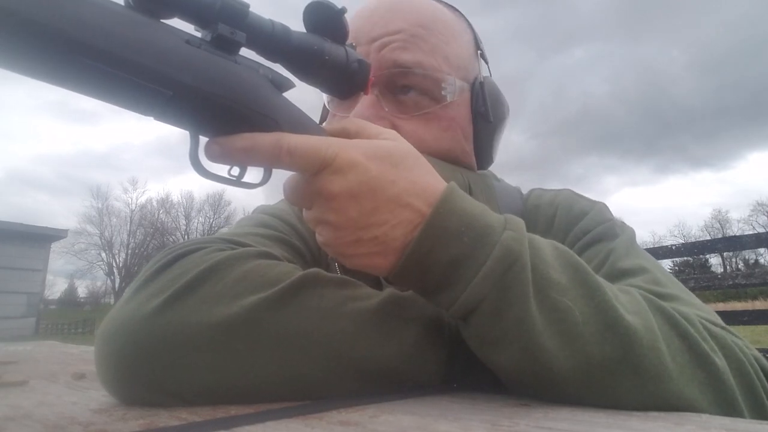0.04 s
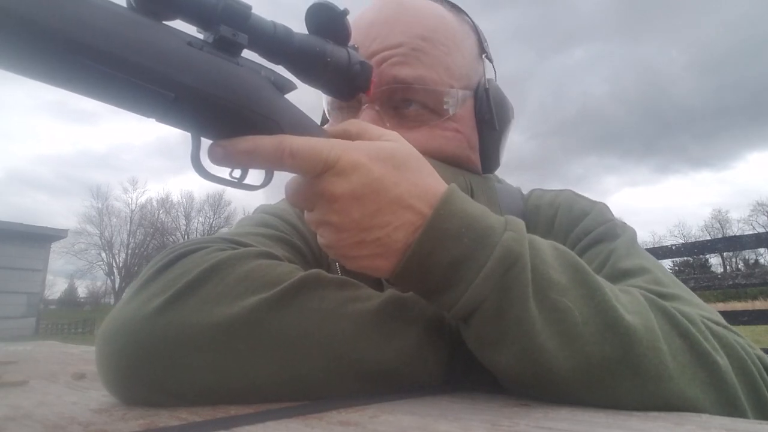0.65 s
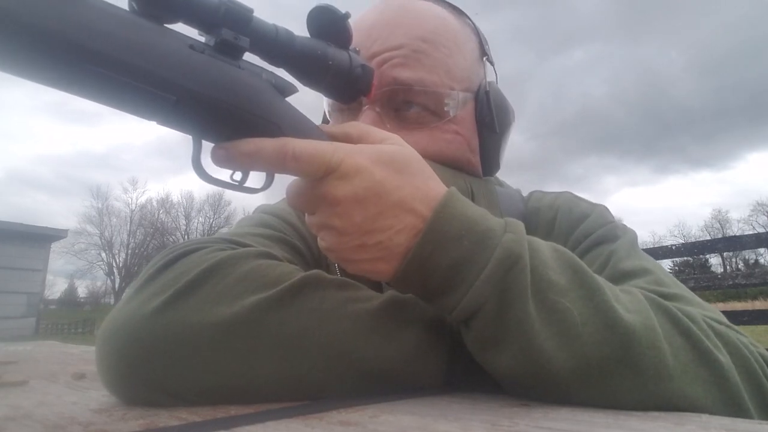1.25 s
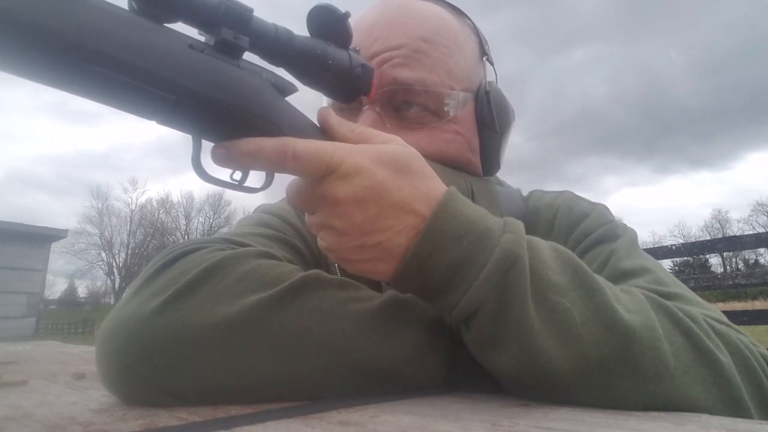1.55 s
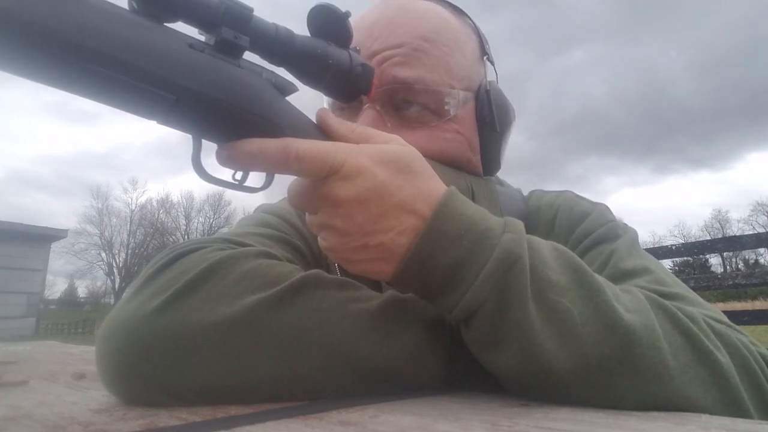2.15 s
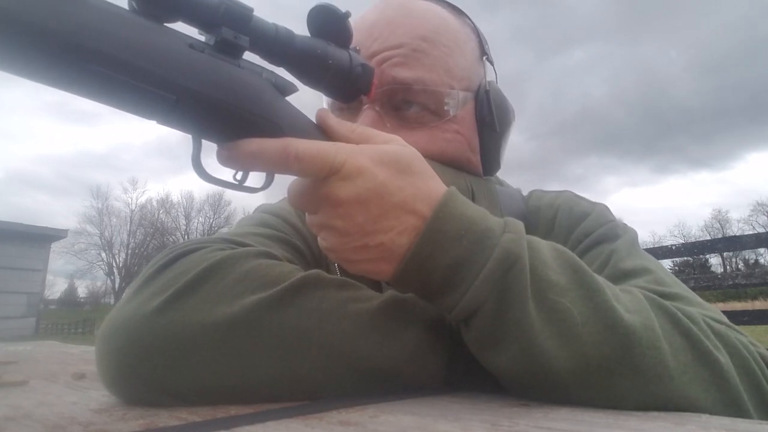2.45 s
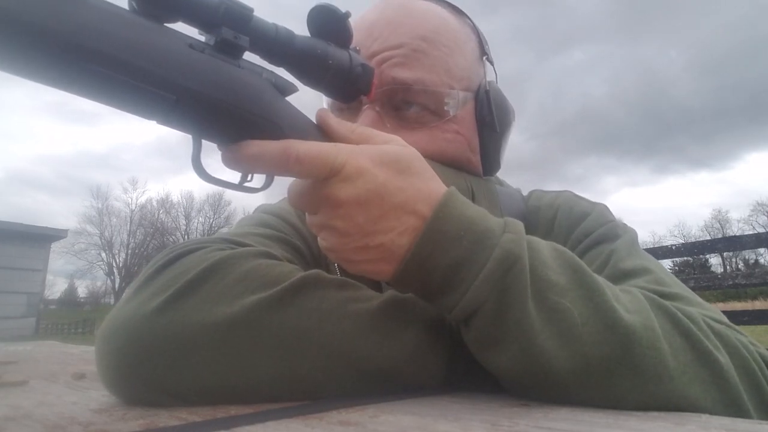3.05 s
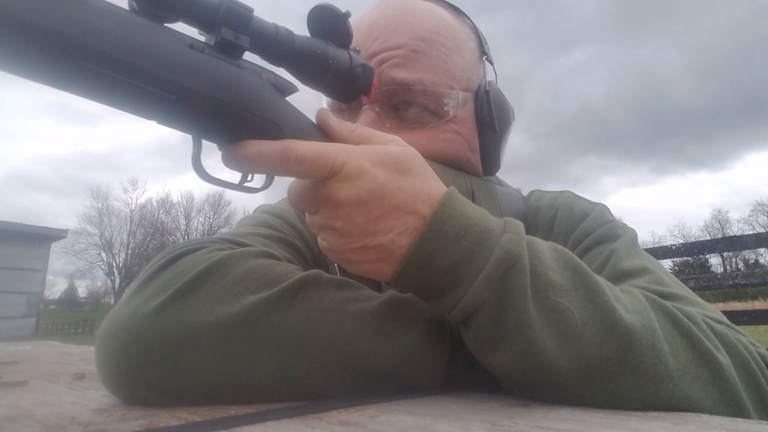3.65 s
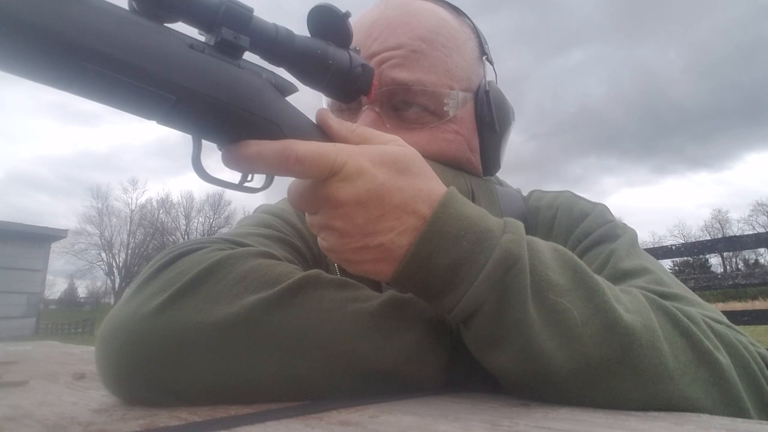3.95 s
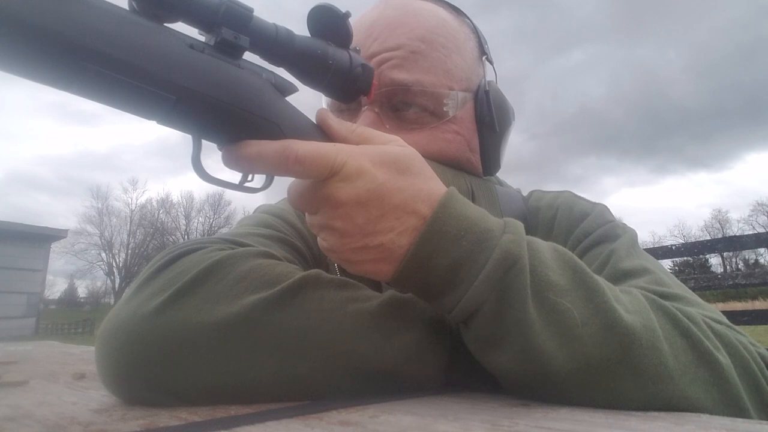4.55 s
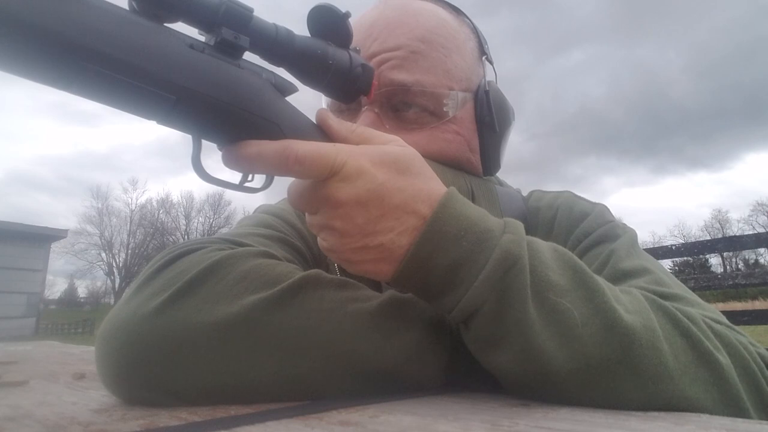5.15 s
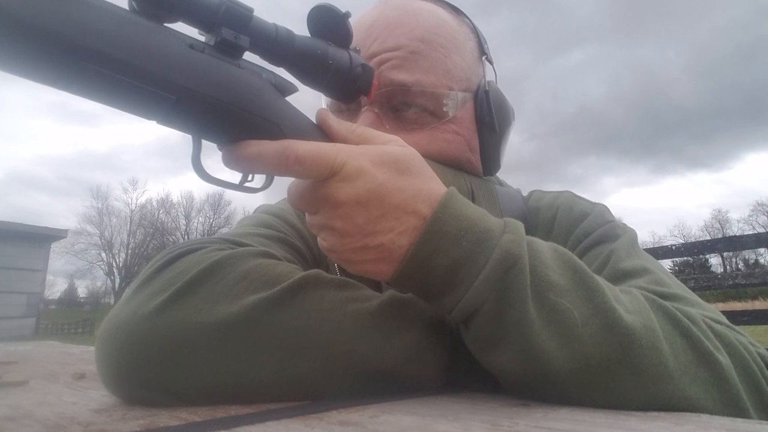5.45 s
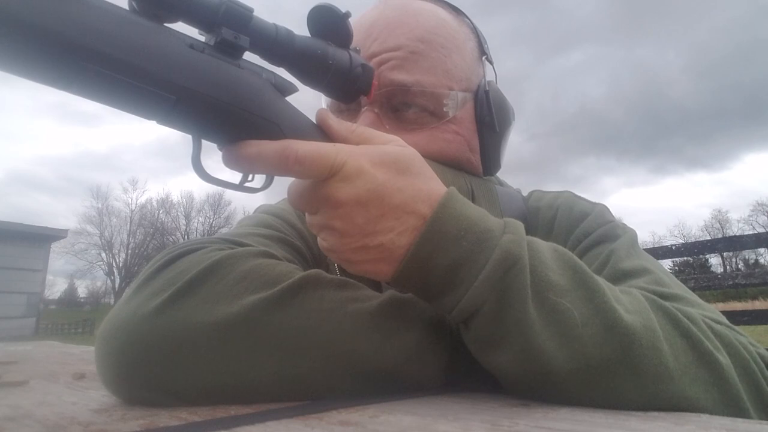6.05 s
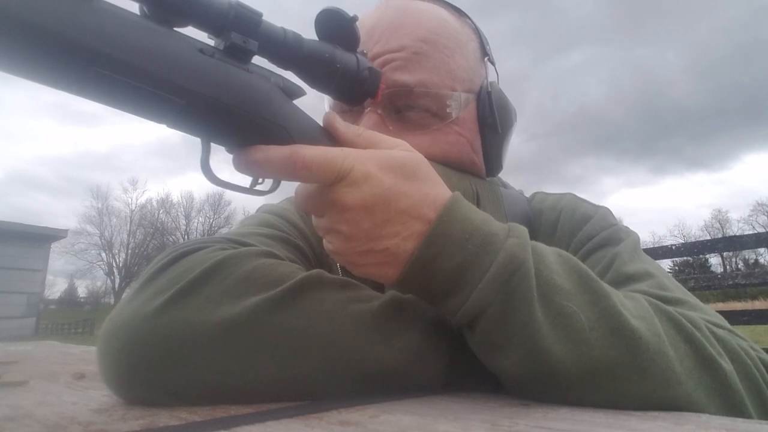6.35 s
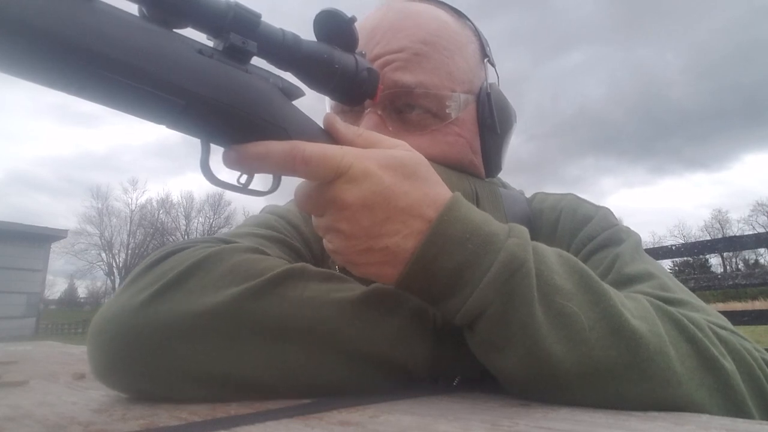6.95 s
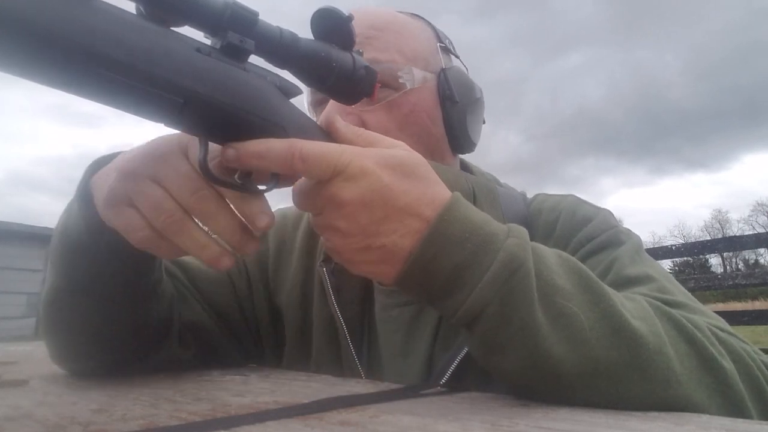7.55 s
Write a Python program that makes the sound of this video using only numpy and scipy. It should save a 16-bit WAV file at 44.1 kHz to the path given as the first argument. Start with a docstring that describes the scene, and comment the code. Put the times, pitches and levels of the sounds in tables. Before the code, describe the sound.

A quiet outdoor range has a faint hush of still air and far traffic. A bird chips softly around 1 second, and a few peeps come just before the small, close click of a rifle's safety at about 1.8 seconds. From 3.4 to 4.7 seconds a distant bird repeats a quick run of faint notes, followed by falling whistles about every half second. At 6.3 seconds a single, very loud rifle shot cracks and booms right beside the microphone, briefly overloading it. Sharp reflections come straight back from nearby walls, then a long echo rolls in from far woods, swelling a little after 7 seconds and fading. Beneath it are a faint sleeve rub, a small metal tick and soft bumps on the bench. At about 7.8 seconds the steel bolt is lifted with a quick, sharp metallic clack.

```python
"""A quiet outdoor range: a rifle is fired from a bench, close to a camera with two microphone ports.
Songbirds whistle over still air and far traffic, and the safety clicks off. The blast, a broadband
impulse, drives the bench into resonance and saturates the microphone. It returns by reflection from
nearby walls, then by scattering from far woods as a long roll. A sleeve rubs the bench, and the
steel bolt is lifted, its impacts exciting the normal modes of the rifle's action."""
import sys
import numpy as np
from scipy import signal
from scipy.fft import rfft, irfft
from scipy.io import wavfile

SR = 44100
rng = np.random.default_rng(int(sys.argv[2]) if len(sys.argv) > 2 else 0)


def master(y):
    """Save y as 16-bit WAV."""
    cut = np.clip(np.atleast_2d(y).T, -1, 1)
    pcm = np.round(cut * 32767)  # scale
    wavfile.write(sys.argv[1], SR, pcm.astype(np.int16))


N = 343980
TIME = np.arange(N) / SR
SHOT_S, PORT_LAG_MS = 6.2875, .41  # instant of firing; travel time of sound from port to port

# spectrum of the open air: f/Hz, relative density/dB
AIR_SPECTRUM = [(15, -50), (25, -14.5), (76, -8), (114, -9), (166, -10), (190, -14.5), (263, -15),
                (354, -13.5), (384, -14.5), (489, -15.5), (734, -17), (1400, -20.5), (2350, -21),
                (6560, -35), (16000, -36.5)]
# glides of each bird note: delay/s, duration/s, start f/Hz, end f/Hz, arch height/Hz, relative level/dB
HOOK_GLIDES = [(0, 0.026, 2230, 2400, 3, -8.5), (.018, 0.039, 2390, 2080, 578, 1)]
OVERTONE_GLIDES = [(0, .022, 4480, 4700, 40, -12.5), (.022, .03, 4740, 3100, 4, -13)]
LEAD_IN_GLIDES = [(-0.1, 0.075, 3900, 3150, 0.0011, -14.5)]
RISE_GLIDES = [(0.0021, 0.049, 3200, 3900, 120, 0)]
CHIP_GLIDES = [(0, 0.019, 4160, 4730, 251.4, 0), (.014, 0.02, 4710, 4050, 150, -1.06)]
PEEP_GLIDES = [(0.00063, 0.013, 2450, 2440, 24, 0)]
# calls of each note: t/s, level/dB
HOOK_CALLS = [(3.4, -65), (3.511, -66.5), (3.617, -66), (3.734, -64.5), (3.847, -65.5), (3.966, -63.5),
              (4.082, -63.5), (4.204, -66), (4.337, -64), (4.506, -65.5), (4.664, -66)]
SLUR_CALLS = [(3.98, -74), (4.626, -62.5), (5.187, -61), (5.658, -60), (6.133, -60)]
RISE_CALLS = [(2.075, -73), (2.39, -74), (2.7, -77)]
CHIP_CALLS = [(0.965, -60.5), (6.1, -58.5)]
PEEP_CALLS = [(1.647, -49), (1.673, -60), (1.687, -54.5)]
# strokes of cloth on the bench: middle t/s, half-width/s, level/dB, treble gain/dB
SLEEVE_STROKES = [(6.59, 0.086, -56.5, -6), (6.758, 0.0079, -50, -9), (6.773, 0.13, -57, -16),
                  (7.15, .17, -63.5, 4), (7.336, .009, -69, 20), (7.531, 0.039, -57, -3),
                  (7.558, 0.24, -74, 10.5)]
# spectrum of cloth friction: f/Hz, relative density/dB
CLOTH_SPECTRUM = [(4500, 1.5), (7000, -4), (10000, -4.5), (14000, -1.5), (16000, -11)]
# shifts of weight on the bench, and the recoil: t/s, level/dB
BENCH_BUMPS = [(0, -60.5), (6.301, -53), (7.283, -57), (7.489, -55), (7.692, -57)]
# low modes of the bench, its sway and thud: f/Hz, relative level/dB, T60/s
SWAY_MODES = [(82.55, 1, 2.2), (128, 4, .2), (162, 4.5, .22)]
# impacts on the rifle's steel (safety, bolt, and a rattle as it settles after the shot): t/s, ring level/dB,
# stock level relative to ring/dB, scrape level/dB
STEEL_CONTACTS = [(1.12, -67, 17, -69), (1.722, -74.5, 18, -76), (1.765, -59, 12.5, -42),
                  (1.778, -49, 11.5, -35.5), (6.756, -51, 10, -49), (7.7597, -31.5, -10, -40),
                  (7.7727, -34, -0.5, -34), (7.784, -34, 6, -28), (7.7877, -17, -2.5, -17.5)]
# modes of the rifle's action: f/Hz, relative level/dB, T60/s
ACTION_MODES = [(197, -13, 0.028), (430, -15, 0.036), (750, 0.5, 0.022), (990, -1, 0.035), (1198, 4, 0.019),
                (1825, -3.5, 0.014), (2360, -8.5, .025), (3400, -15, 0.022), (5130, 2.5, 0.011),
                (5970, 6, 0.0044), (7660, -36, 0.15), (9200, -19, 0.022), (11100, -32, .014),
                (12100, -23, 0.01), (13500, -9, 0.011)]
# spectrum of steel sliding on steel: f/Hz, relative density/dB
SCRAPE_SPECTRUM = [(2500, 3), (5700, -13), (8000, -2), (10500, -7), (14000, 4.5)]
# envelope of the roll from the woods: band f/Hz, level/dB, rise/(dB/s), hold/s, fall/(dB/s)
ROLL_BANDS = [(363.4, -43.5, 41.5, 0.22, 27.5), (1630, -39, 67, .14, 33.5), (2950, -44, 23, 0.096, 35.5)]
# spectrum of the roll before its bands are levelled: f/Hz, relative density/dB
ROLL_SPECTRUM = [(59, -43), (100, -13), (220, -12.5), (332, -3), (420, -11), (543, -8), (674, -12),
                 (853, -7), (1370, -5), (1700, -5.5), (2890, -9), (4450, -19.5), (5860, -30.5),
                 (11000, -47), (14300, -75), (22000, -120)]
# clusters of scattered sound: t/s, level/dB, rise/s, T60 factor, treble gain/dB, downrange share
SCATTER_CLUSTERS = [(6.297, -12, 0.0025, 1, 3, 0.4), (6.371, -22, 0.002, 1.6, -1.5, 0.4),
                    (6.379, -16, 0.00089, 0.4, 8, 0.21), (6.388, -19, 0.0021, 0.88, -0.5, 0.6),
                    (6.568, -47, 0.012, 1.22, 20.5, 0.65)]
# spectrum of a cluster: f/Hz, relative density/dB
SCATTER_SPECTRUM = [(40, -31), (120, -12), (190, -12), (300, 0), (450, -2), (800, -2.5), (1400, -5.5),
                    (2200, -11.5), (3000, -10.5), (5200, -20.5), (7500, -30.5), (12500, -26.5),
                    (16000, -25.5)]
# decay of a cluster: band f/Hz, T60/s
SCATTER_T60 = [(100, 0.33), (400, 0.48), (1000, 0.29), (3000, 0.24), (10000, 0.32)]
# two sharp pressure pulses of the boom itself, then its echoes: t/s, level/dB, pulse duration/ms
PRESSURE_PULSES = [(6.2964, 11, 0.91), (6.3027, 3, 1.04), (6.3147, -5.5, 1.05), (6.3254, -1.5, 0.88),
                   (6.3468, -7, 0.44), (6.3725, -2.5, 1.1), (6.3877, 1, 0.51), (6.642, -27, 1.59),
                   (6.822, -17, 0.23), (6.926, -22, 1.64), (7.084, -17.5, 0.37), (7.249, -19.5, 0.24),
                   (7.285, -14, 0.35), (7.376, -17.5, 0.45)]
# modes of bench and camera excited by the blast: f/Hz, relative level/dB, T60/s
BOOM_MODES = [(123.7, -33, 0.013), (218, -15.5, 0.025), (342, 8, 0.028), (649, 3.5, 0.016),
              (1320, 5.5, .025)]
# spectrum of the shot's front: f/Hz, relative density/dB
CRACK_SPECTRUM = [(60, -35), (200, -2.5), (450, 1), (850, -0.5), (1400, 2.5), (3000, -1), (5000, -6.5),
                  (7500, -11), (11000, -4.5), (15500, -7)]


def from_db(db):
    """Amplitude ratio: a factor of ten per 20 dB."""
    return 10 ** (np.asarray(db) / 20)


def unit_rms(x):
    """Normalisation to unit mean power."""
    return x / np.sqrt(np.mean(x ** 2) + 1e-20)


def add(out, s, sound):
    """Superposition: a sound joins the mix at s seconds."""
    start = int(round(s * SR))
    part = sound[..., :N - start]
    out[:, start:start + part.shape[-1]] += part


def butter(x, hz, kind, order=2):
    """Causal Butterworth filtering, high- or low-pass."""
    return signal.sosfilt(signal.butter(order, min(hz, .45 * SR), kind, fs=SR, output="sos"), x)


def bands(x, centres):
    """Complementary filtering: overlapping bands that sum to the whole."""
    size = x.shape[-1]
    log_hz, spectrum = np.log(np.fft.rfftfreq(size, 1 / SR) + 1), rfft(x)
    weights = [np.interp(log_hz, np.log(centres), row) for row in np.eye(len(centres))]
    return [irfft(spectrum * weight, size) for weight in weights]


def drift(rate, size):
    """Random modulation: linear interpolation of `rate` Gaussian values a second."""
    knots = rng.standard_normal(4096)
    return np.interp(np.arange(size) / SR * rate, np.arange(len(knots)), knots)


def swell(middle_s, half_s):
    """Gaussian envelope about one instant."""
    return np.exp(-((TIME - middle_s) / half_s) ** 2)


def ring(hz, t60, t):
    """Free vibration of one damped mode."""
    return np.sin(2 * np.pi * hz * t) * from_db(-60 * t / t60)


def ports(x, lag_ms):
    """Path difference: the far port hears later; a positive lag puts the source on the right."""
    t = np.arange(len(x)) / SR
    return np.array([np.interp(t - max(lag, 0) / 1000, t, x, left=0) for lag in (lag_ms, -lag_ms)])


def field_noise(spectrum, downrange, size, incoherent=0):
    """Spatial coherence: a plane wave from downrange plus a diffuse field, in part unique to each port."""
    hz = np.fft.rfftfreq(size, 1 / SR) + 1e-3
    mid, side, beam = rfft(rng.standard_normal((3, size)))
    lag_cycles = hz * PORT_LAG_MS / 1000
    coherence = np.sinc(2 * lag_cycles) * (1 - incoherent)
    diffuse = np.sqrt((1 + coherence) / 2) * mid + np.sqrt((1 - coherence) / 2) * side * [[1], [-1]]
    plane = beam * np.exp(-2j * np.pi * lag_cycles * [[1], [0]])
    field = np.sqrt(1 - downrange) * diffuse + np.sqrt(downrange) * plane
    points, db = np.transpose(spectrum)
    gain = from_db(np.interp(np.log(hz), np.log(points), db))
    roll_off = np.hypot(1, (.5 * points[0] / hz) ** 2) * np.hypot(1, (.5 * hz / points[-1]) ** 4)
    return unit_rms(irfft(field * gain / roll_off, size))


def drone(hz, width_hz, apart_db):
    """Narrow-band noise by random quadrature modulation, mostly common to both ports."""
    phase = 2 * np.pi * hz * TIME
    shared, left, right = [drift(width_hz, N) * np.sin(phase) + drift(width_hz, N) * np.cos(phase)
                           for _ in range(3)]
    return unit_rms(shared + from_db(apart_db) * np.array([left, right]))


def microphone_hiss(level_db=-75, above_hz=12300):
    """Self-noise of the microphone: high treble, uncorrelated between the ports."""
    return from_db(level_db) * unit_rms(butter(rng.standard_normal((2, N)), above_hz, "high", order=4))


def background(nearest_s=3.0, passing_s=.98):
    """Far traffic swells and recedes by the inverse-distance law, over still air and a brief hum."""
    relative_distance = np.hypot(1, (TIME - nearest_s) / passing_s)
    traffic = from_db(-74) / relative_distance * drone(hz=110.6, width_hz=28, apart_db=-14)
    hum = from_db(-74.5) * swell(middle_s=3.6, half_s=.22) * drone(hz=302, width_hz=10, apart_db=-4)
    air = from_db(-66.5) * field_noise(AIR_SPECTRUM, .04, N, incoherent=.56)
    return air + traffic + hum


def whistle(pitch, rasp, rasp_rate=900, waver=.0038):
    """Frequency modulation of a tone: slow flutter is heard as waver, fast flutter as rasp."""
    flutter = waver * drift(40, len(pitch)) + rasp * drift(rasp_rate, len(pitch))
    return np.sqrt(2) * np.sin(2 * np.pi * np.cumsum(pitch * (1 + flutter)) / SR)


def song(glides, calls, lag_ms, rasp, detune=.011):
    """Parabolic frequency sweeps form a bird's note, slightly detuned at each call."""
    out = np.zeros((2, N))
    for s, db in calls:
        for delay_s, length_s, start_hz, end_hz, arch_hz, glide_db in glides:
            progress = np.linspace(0, 1, int(length_s * SR))
            arch = 4 * progress * (1 - progress)
            pitch = start_hz + (end_hz - start_hz) * progress + arch_hz * arch
            pitch *= 1 + detune * rng.standard_normal()
            add(out, s + delay_s, ports(from_db(db + glide_db) * arch * whistle(pitch, rasp), lag_ms))
    return out


def slurs(start_hz=2970, end_hz=1690, sink_s=.06, attack_s=.0099, hold_s=.03, fade_db_per_s=140.5):
    """Exponential relaxation of pitch gives a bird's long falling whistle."""
    out, t = np.zeros((2, N)), TIME[:SR // 4]
    pitch = end_hz + (start_hz - end_hz) * np.exp(-t / sink_s)
    fade = from_db(-fade_db_per_s * np.maximum(t - attack_s - hold_s, 0))
    envelope = np.minimum(t / attack_s, 1) * fade
    for s, db in SLUR_CALLS:
        add(out, s, ports(from_db(db) * envelope * whistle(pitch, rasp=.022), PORT_LAG_MS))
    return out


def birds(reverb_db=-3, trees_t60=.32, near_send=.57):
    """Reverberation among trunks smears the birds downrange, and less so the nearer ones on each side."""
    far_notes = [(HOOK_GLIDES, HOOK_CALLS), (OVERTONE_GLIDES, HOOK_CALLS[:-2]),
                 (LEAD_IN_GLIDES, SLUR_CALLS), (RISE_GLIDES, RISE_CALLS)]
    far = slurs() + sum(song(glides, calls, PORT_LAG_MS, rasp=.019) for glides, calls in far_notes)
    chips = song(CHIP_GLIDES, CHIP_CALLS, PORT_LAG_MS, rasp=.11)
    peeps = song(PEEP_GLIDES, PEEP_CALLS, -PORT_LAG_MS, rasp=.075) * from_db([[0], [-4]])
    near = chips + peeps
    response = rng.standard_normal((2, SR)) * from_db(-60 * TIME[:SR] / trees_t60)
    response /= np.sqrt(np.sum(response ** 2, axis=1, keepdims=True))
    reverb = signal.fftconvolve(far + near_send * near, response, axes=1)[:, :N]
    return far + near + from_db(reverb_db) * reverb


def sleeve(grain_db=2, centres_hz=(10000, 13000)):
    """Friction noise of cloth as the arm takes the recoil, sharper as it reaches for the bolt."""
    soft, sharp = bands(field_noise(CLOTH_SPECTRUM, 0, N), centres_hz)
    strokes = np.array([from_db(db) * swell(s, half_s) for s, half_s, db, _ in SLEEVE_STROKES])
    treble_gain = from_db([row[3:] for row in SLEEVE_STROKES])
    # overlapping strokes add in power
    rub = soft * np.linalg.norm(strokes, axis=0) + sharp * np.linalg.norm(strokes * treble_gain, axis=0)
    return rub * from_db(grain_db * drift(120, N))


def bench(detune=.049, rise_s=.014):
    """Each bump excites the bench's low modes to thud and hum; mass loading shifts their pitch."""
    out, t = np.zeros((2, N)), TIME[:2 * SR]
    for s, db in BENCH_BUMPS:
        tuning = 1 + detune * rng.uniform(-1, 1)
        thud = sum(from_db(db + mode_db) * ring(hz * tuning, t60, t) for hz, mode_db, t60 in SWAY_MODES)
        add(out, s, ports(thud * np.minimum(t / rise_s, 1), lag_ms=.7))
    return out


def action(stock_below_hz=3000, scrape_t60=.018, stock_rise_s=.0025, steel_rise_s=.00044, spread_ms=.066):
    """Impact excitation: a short scrape rings the steel receiver; the heavier stock responds more slowly."""
    out, t = np.zeros((2, N)), TIME[:SR // 6]
    steel_onset, stock_onset = np.minimum(t / steel_rise_s, 1), np.minimum(t / stock_rise_s, 1)
    for s, ring_db, stock_db, scrape_db in STEEL_CONTACTS:
        scrape_envelope = steel_onset * from_db(scrape_db - 60 * t / scrape_t60)
        knock = scrape_envelope * field_noise(SCRAPE_SPECTRUM, 0, len(t))
        for hz, db, t60 in ACTION_MODES:
            onset = from_db(stock_db) * stock_onset if hz < stock_below_hz else steel_onset
            mode = from_db(ring_db + db) * onset * ring(hz, t60, t)
            knock += ports(mode, spread_ms * rng.standard_normal())
        add(out, s, knock)
    return out


def trunk_crackle(size, trunks_per_s=30, strength=.68, decay_s=.0027):
    """A Poisson process: single trunks stand out of the roll as brief jumps in gain."""
    jumps = (rng.random(size) < trunks_per_s / SR) * np.minimum(rng.exponential(1, size), 3)
    spikes = signal.lfilter([1], [1, -np.exp(-1 / (decay_s * SR))], jumps + 1e-18)
    return unit_rms(1 + strength * spikes)


def woods(start_s=6.5, onset_s=.066, tree_line_s=7.077, grain_db=1.5):
    """Backscatter from countless trunks swells until the main tree line answers, holds, then decays."""
    out, t = np.zeros((2, N)), start_s + TIME[:2 * SR]
    returns = field_noise(ROLL_SPECTRUM, .45, len(t), incoherent=.24) * trunk_crackle(len(t))
    parts = bands(returns, [row[0] for row in ROLL_BANDS])
    shared_grain = drift(180, len(t))
    onset = np.minimum((t - start_s) / onset_s, 1)
    for part, (_, db, rise, hold_s, fall) in zip(parts, ROLL_BANDS):
        level_db = db - rise * np.maximum(tree_line_s - t, 0)
        level_db -= fall * np.maximum(t - tree_line_s - hold_s, 0)
        level_db += grain_db * (.22 * shared_grain + .6 * drift(90.3, len(t)))
        add(out, start_s, unit_rms(part) * from_db(level_db) * onset)
    return out


def air_absorption(x, arrival_s, cutoff_at_1s_hz=3300):
    """Atmospheric absorption: the cutoff falls as the inverse square root of travel time."""
    return butter(x, cutoff_at_1s_hz / np.sqrt(arrival_s - SHOT_S), "low")


def scatter(treble_hz=2200, grain_db=3, grains_per_s=400):
    """Diffuse scattering from fences, sheds and the first trees returns dense, crackling clusters."""
    out, t = np.zeros((2, N)), TIME[:SR]
    centres, t60s = np.transpose(SCATTER_T60)
    treble_share = centres ** 4 / (centres ** 4 + treble_hz ** 4)
    for s, db, rise_s, stretch, treble_db, downrange in SCATTER_CLUSTERS:
        parts = bands(field_noise(SCATTER_SPECTRUM, downrange, len(t), incoherent=.49), centres)
        tail = sum(part * from_db(treble_db * share - 60 * t / (t60 * stretch))
                   for part, share, t60 in zip(parts, treble_share, t60s))
        grain = unit_rms(from_db(grain_db * drift(grains_per_s, len(t))))
        add(out, s, from_db(db) * air_absorption(tail, s) * np.minimum(t / rise_s, 1) * grain)
    return out


def blast_pulses(low_cut_hz=230, dull_hz=3800, wake_db=-24, near_t60=.065, turn_s=6.335, turn_width_s=.033):
    """N-waves: the boom's own sharp pressure pulses, then its reflections from walls and trunks."""
    out, t = np.zeros((2, N)), TIME[:SR // 16]
    for s, db, length_ms in PRESSURE_PULSES:
        travel_s = s - SHOT_S
        progress = 1000 * t / length_ms
        n_wave = (1 - 2 * progress) * (progress < 1)
        wake_t60 = near_t60 + .04 * travel_s  # the rough wake lengthens with distance
        roughness = from_db(wake_db - 60 * t / wake_t60) * rng.standard_normal(len(t))
        wake = signal.fftconvolve(n_wave, roughness)[:len(t)] / np.sqrt(length_ms * 10)
        breakup = from_db(7 * travel_s)  # far echoes are mostly wake
        pulse = air_absorption(n_wave / breakup + breakup * wake, s)
        pulse = butter(butter(pulse, low_cut_hz, "high"), dull_hz, "low", order=1)
        # early pulses come from the left, later ones from downrange on the right
        lag_ms = PORT_LAG_MS * np.tanh((s - turn_s) / turn_width_s)
        add(out, s, ports(from_db(db) * pulse, lag_ms))
    return out


def muzzle(crack_db=-4.5, rise_s=.00083, hold_s=.0063, crack_t60=.03,
           boom_s=6.2963, boom_db=1, boom_rise_s=.0021):
    """Impulse excitation: a bright crack, then the pressure wave sets bench and camera booming."""
    out, t = np.zeros((2, N)), TIME[:SR // 4]
    decay = from_db(-60 * np.maximum(t - rise_s - hold_s, 0) / crack_t60)
    envelope = np.minimum(t / rise_s, 1) ** 2 * decay
    crack = envelope * field_noise(CRACK_SPECTRUM, 0, len(t), incoherent=.4)
    add(out, SHOT_S, from_db(crack_db) * crack)
    modes = sum(from_db(db) * ring(hz, t60, t) for hz, db, t60 in BOOM_MODES)
    boom = modes * (1 - np.exp(-t / boom_rise_s))
    add(out, boom_s, ports(from_db(boom_db) * boom, -PORT_LAG_MS))
    return out


def scene():
    """Linear superposition of the range, the shot with its echoes, and the shooter's handling."""
    ambience = (background() + birds() + microphone_hiss()) * from_db([[-.6], [.6]])
    shot = muzzle() + blast_pulses() + scatter() + woods()
    return ambience + shot + sleeve() + bench() + action()


def record(dry, cutoff_hz=16000):
    """Saturation: the microphone soft-clips the blast, and a steep low-pass limits the bandwidth."""
    overloaded = np.tanh(dry)
    return signal.sosfilt(signal.ellip(10, .2, 70, cutoff_hz, fs=SR, output="sos"), overloaded)


dry = scene()
out = record(dry)
master(out)
```